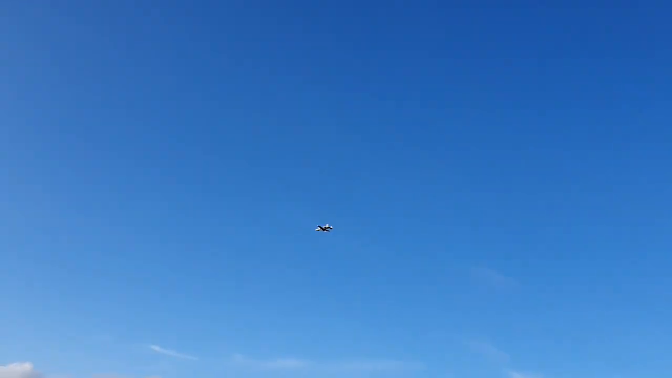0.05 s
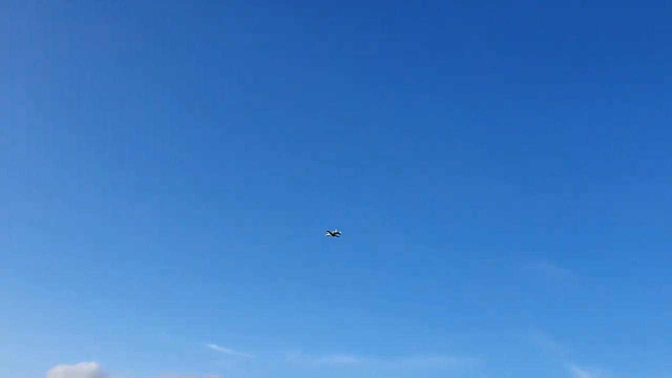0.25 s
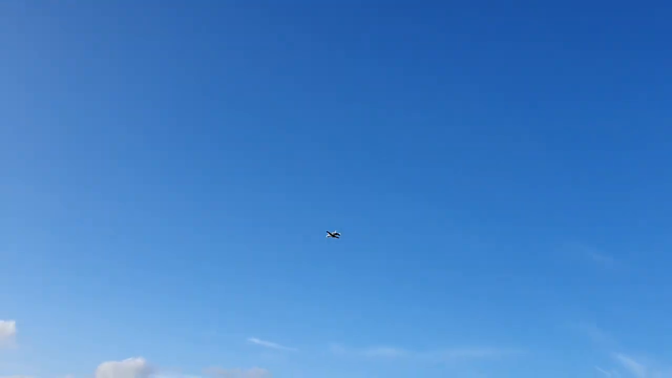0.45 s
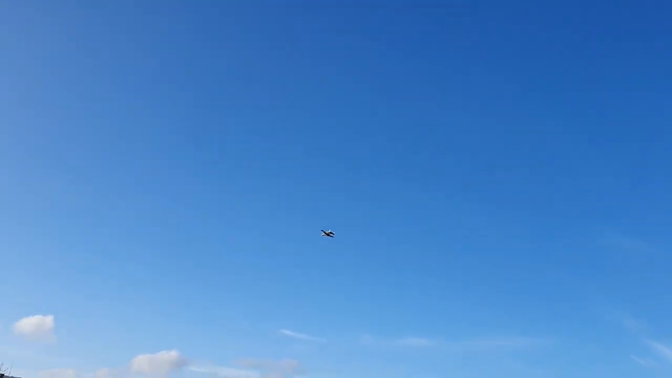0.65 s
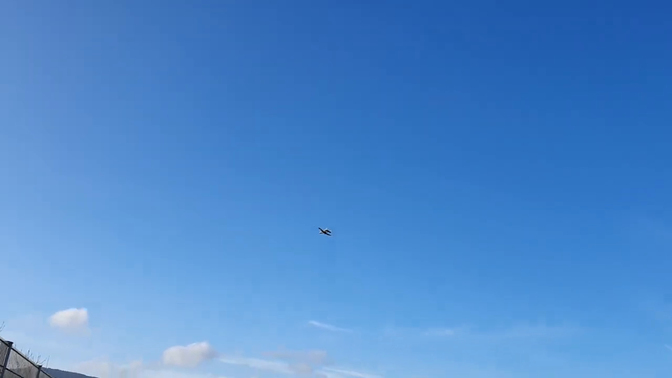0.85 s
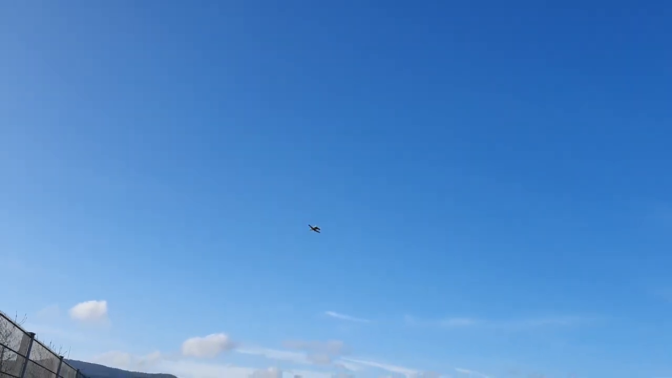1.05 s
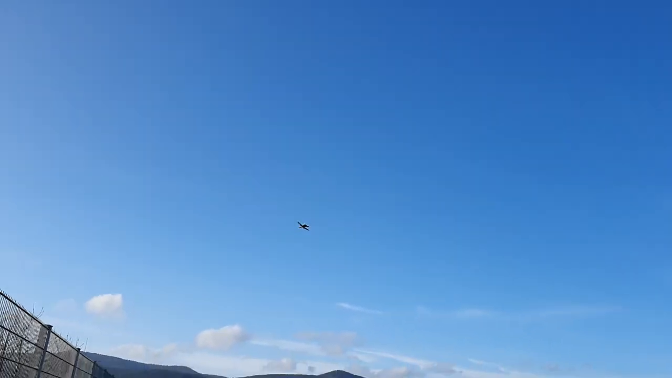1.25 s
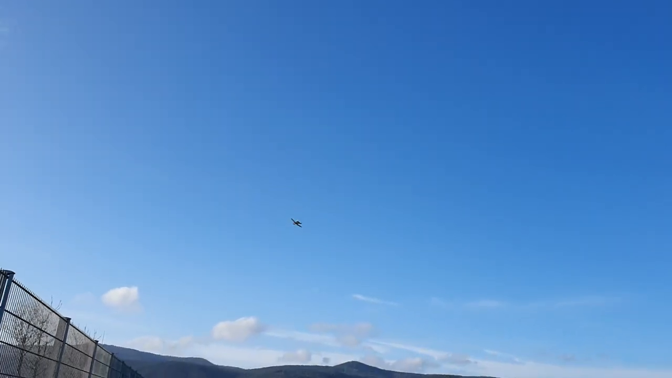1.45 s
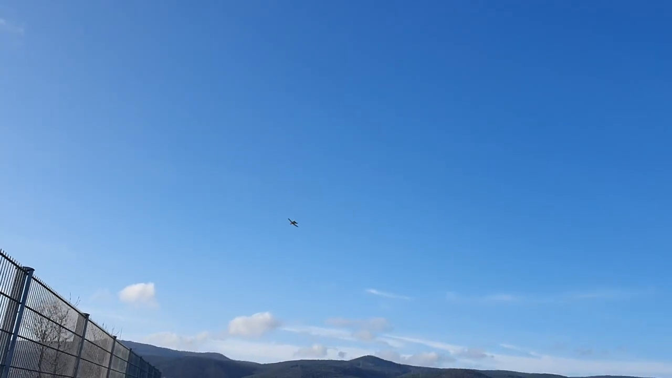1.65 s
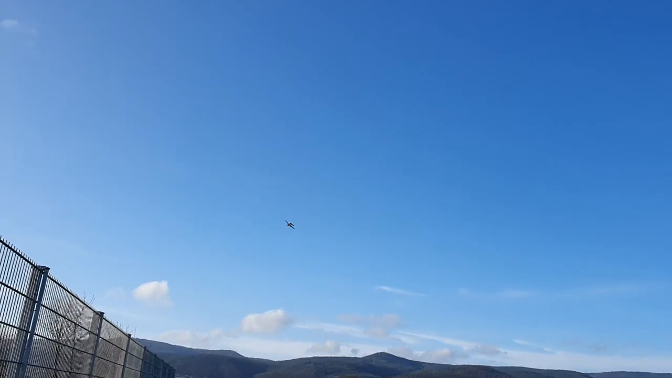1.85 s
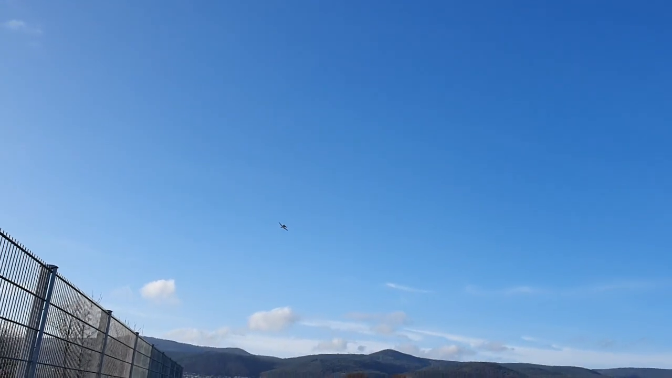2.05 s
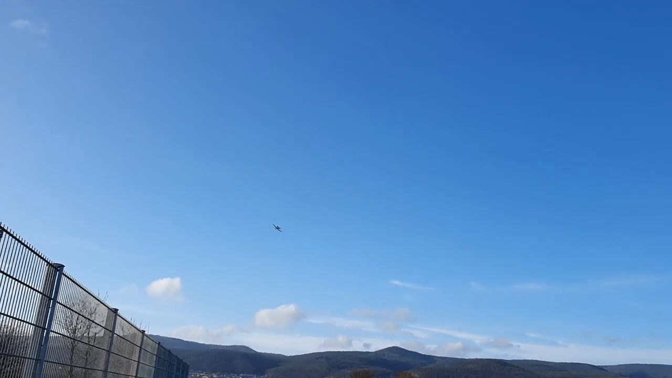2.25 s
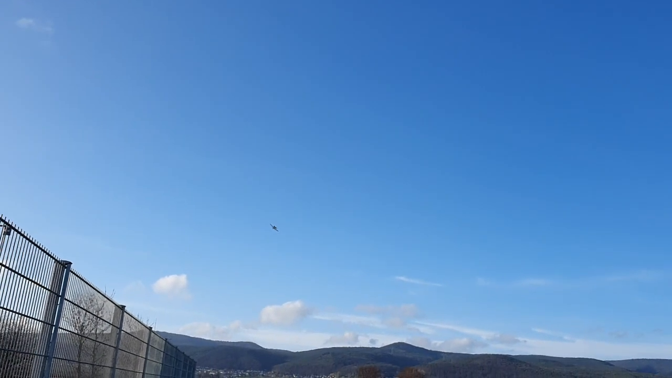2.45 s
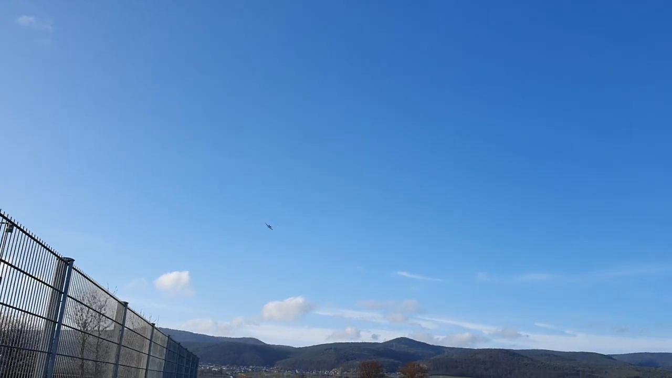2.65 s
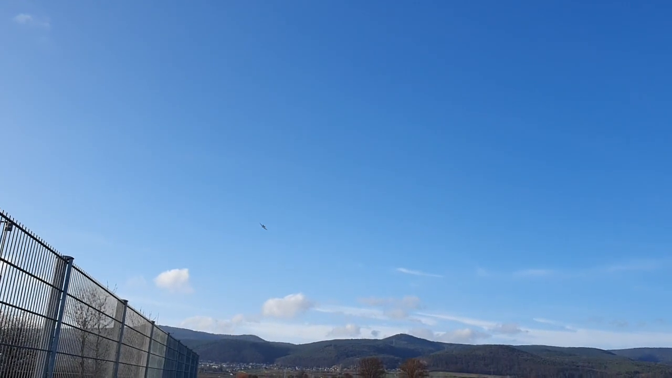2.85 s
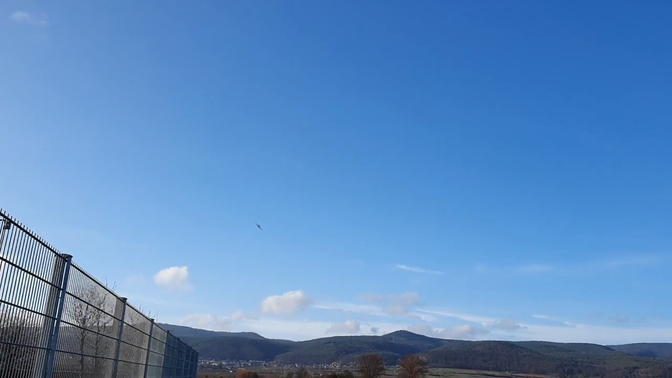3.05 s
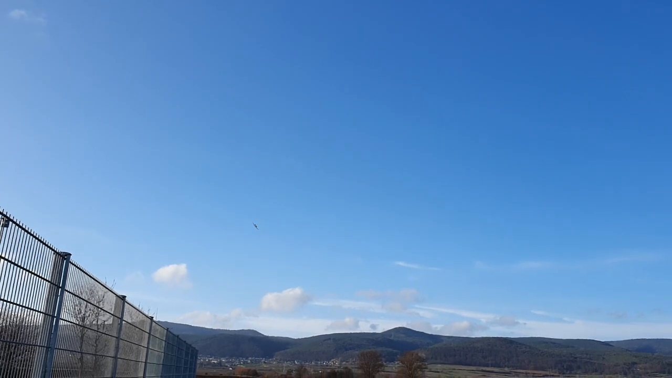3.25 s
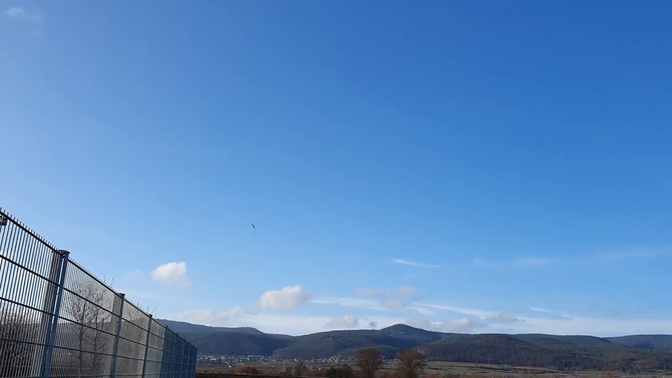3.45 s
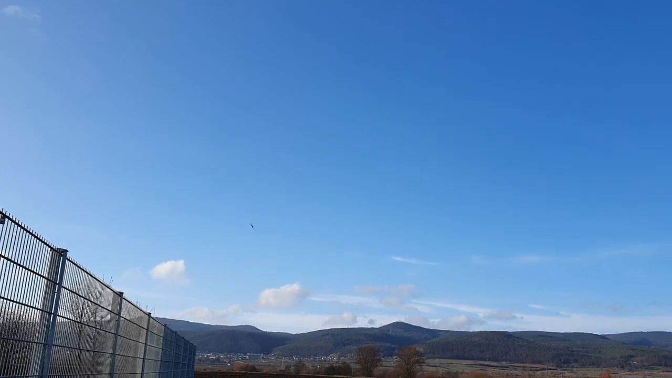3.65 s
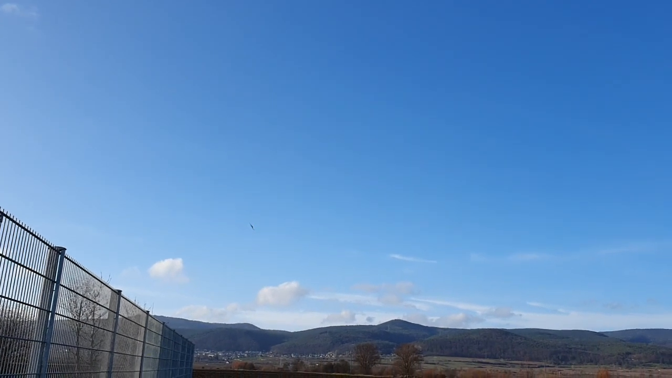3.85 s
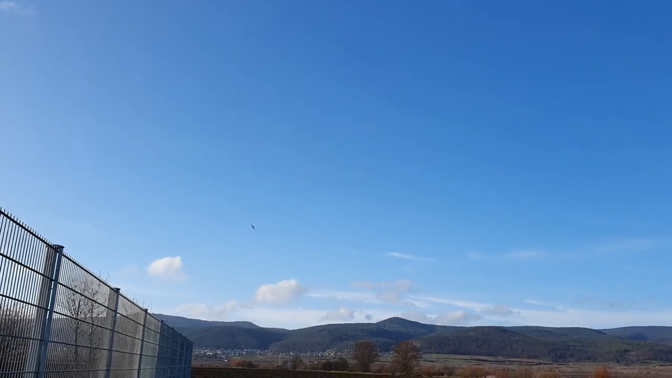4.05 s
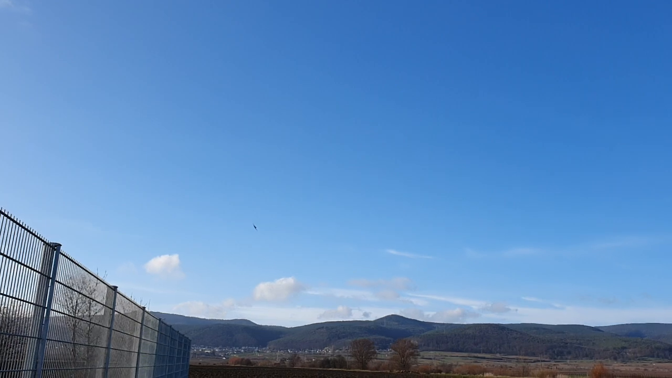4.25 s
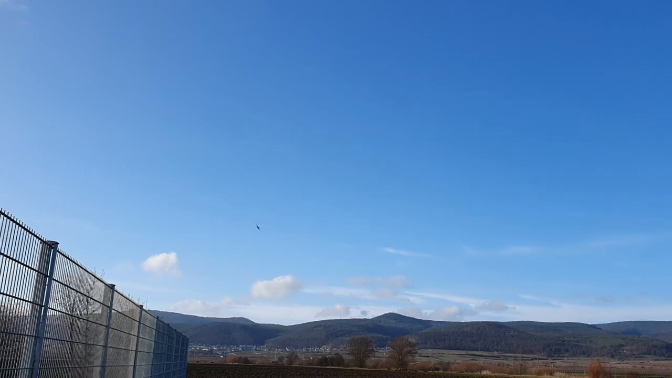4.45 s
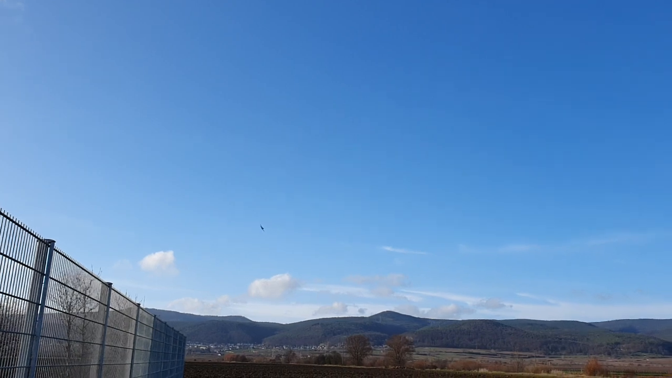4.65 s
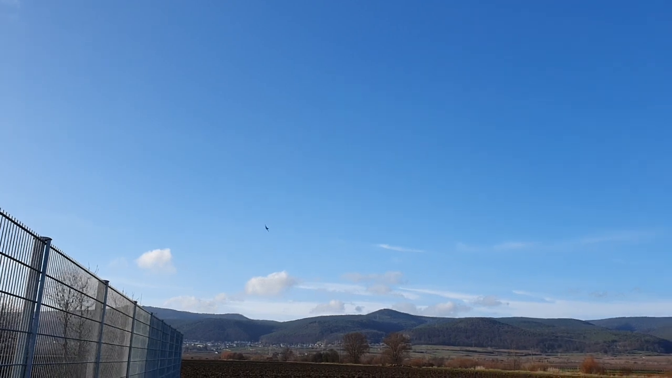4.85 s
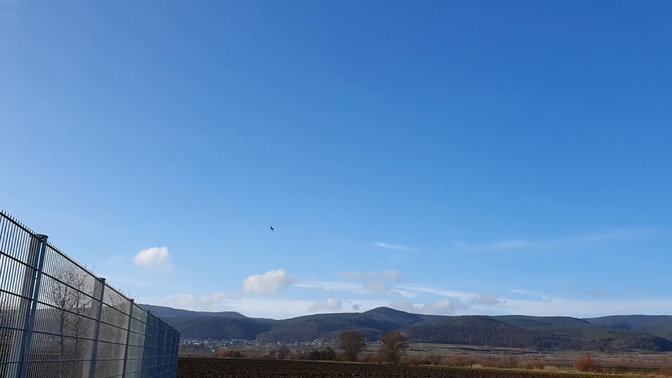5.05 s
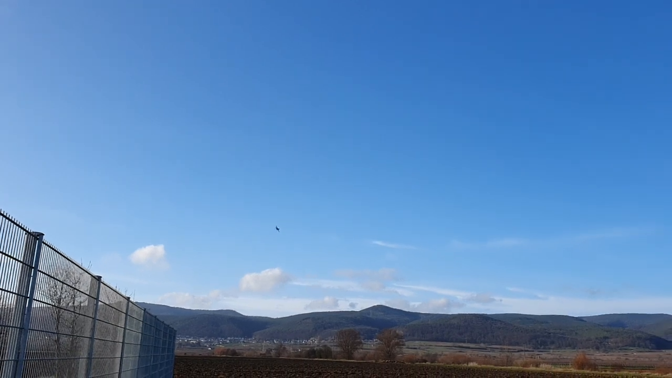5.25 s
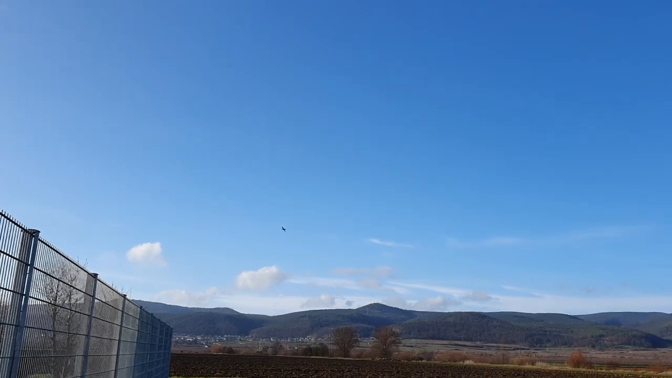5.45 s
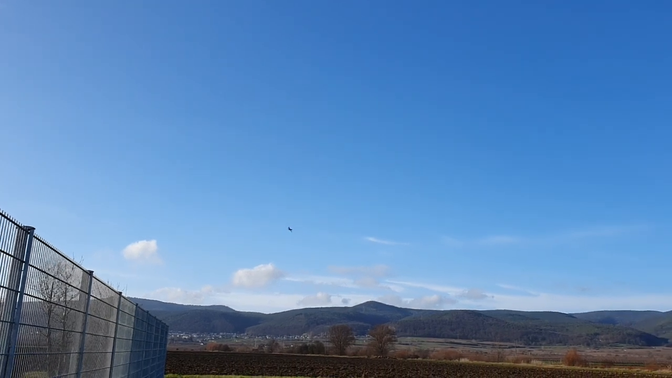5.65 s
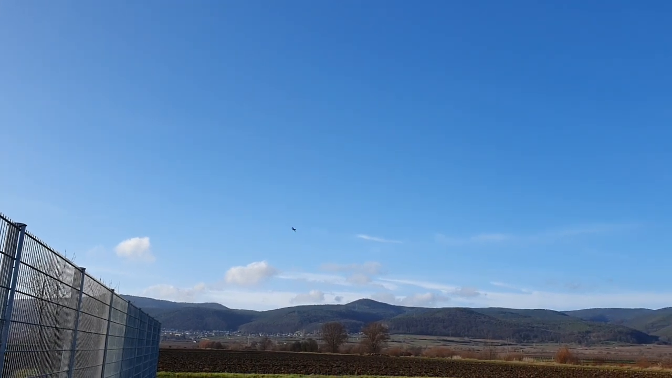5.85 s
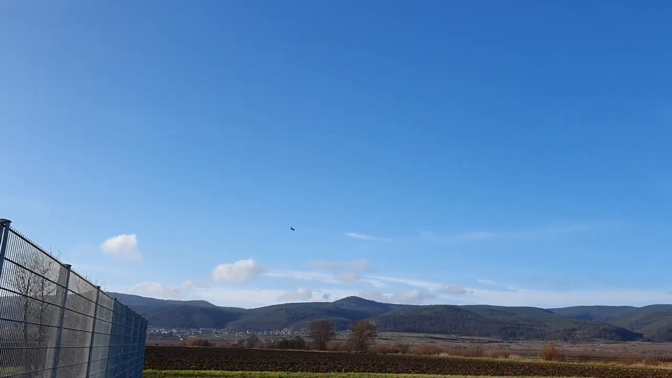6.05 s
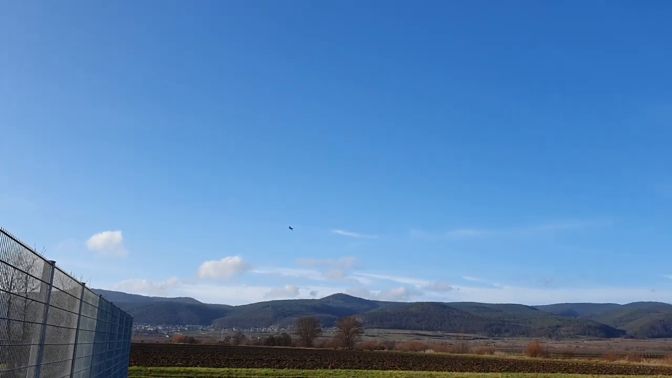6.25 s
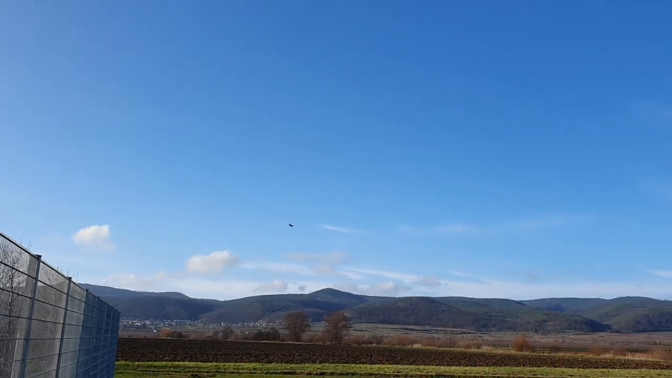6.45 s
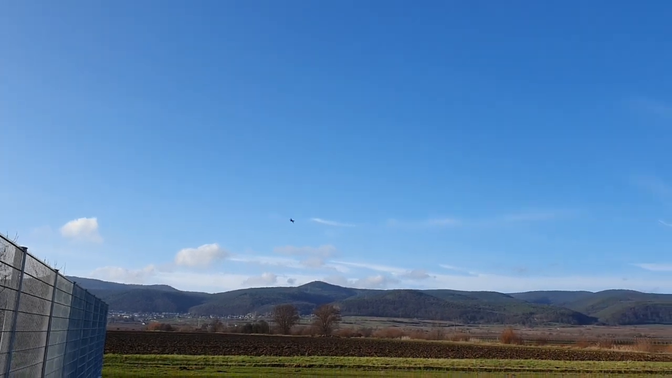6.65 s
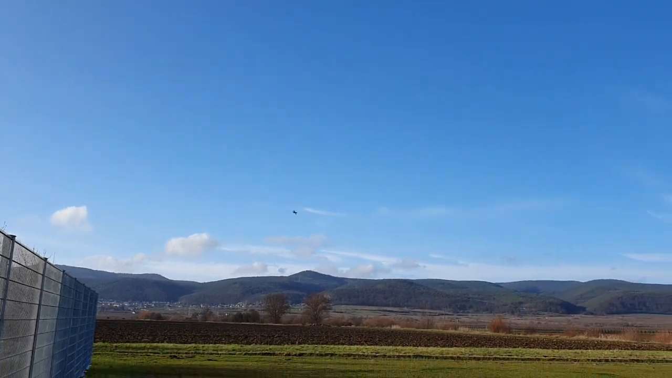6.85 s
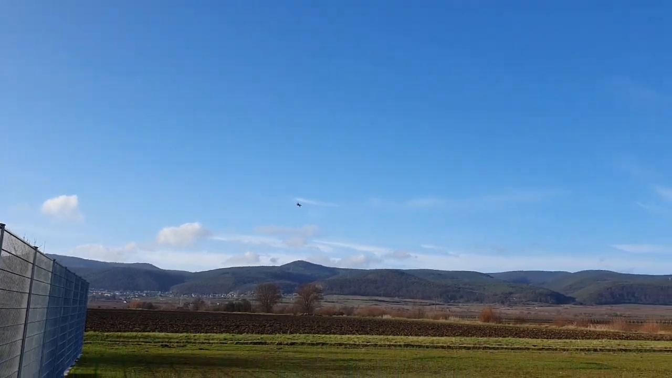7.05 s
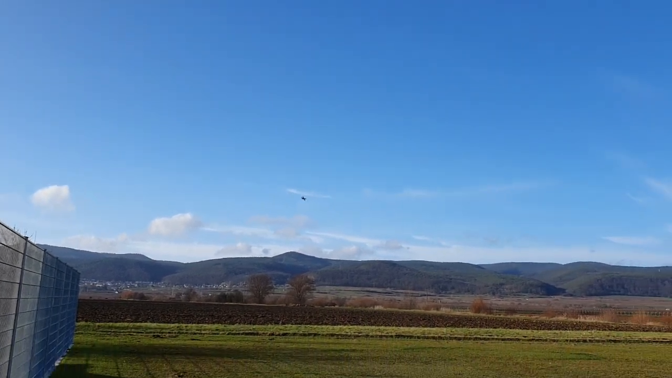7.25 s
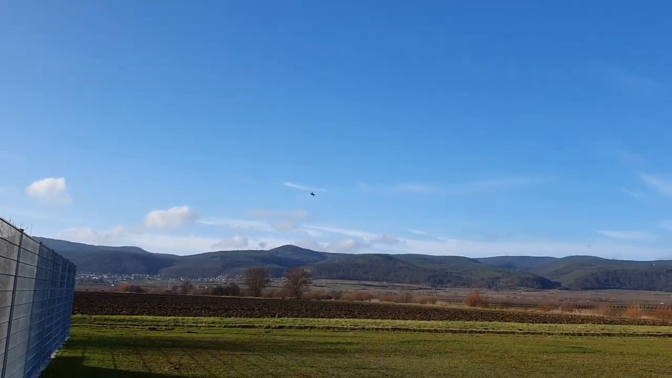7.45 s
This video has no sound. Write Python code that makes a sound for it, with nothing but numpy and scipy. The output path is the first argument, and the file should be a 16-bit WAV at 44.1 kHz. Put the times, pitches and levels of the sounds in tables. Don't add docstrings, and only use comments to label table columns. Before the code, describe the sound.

Open farmland, handheld stereo camera microphone. A turbine roar of turbulent exhaust begins strong and bright, then shrinks over about three seconds to a distant, dull, uneven rush that wavers in level and tone. Ground reflection gives it a phaser-like upward sweep. Soft bass gusts bump irregularly between left and right, over a faint low engine hum; a faint cloth rustle comes around six seconds.

```python
import sys
import numpy as np
from scipy import signal
from scipy.fft import rfft, irfft, next_fast_len
from scipy.io import wavfile
from scipy.ndimage import uniform_filter1d, map_coordinates

SR = 44100
rng = np.random.default_rng(int(sys.argv[2]) if len(sys.argv) > 2 else 0)


def volts_from_decibels(level):
    exponent = np.asarray(level, float) / 20
    return 10 ** exponent


def wav_out(sig):
    wavfile.write(sys.argv[1], SR, np.round(np.clip(np.atleast_2d(sig).T, -1, 1) * 32767).astype(np.int16))


N = 331191
FRAME = 1024
CONTROL_STEP = 32
FURROW_HZ = 2500

# time_s, distance (0 near - 1 far), bearing (0 start - 1 end)
FLIGHT = [
    (0, 0, 0),
    (.8, .1, .05),
    (1.5, .3, .3),
    (2.2, .5, .55),
    (3, .8, .9),
    (3.8, .9, 1),
    (4.7, 1, 1),
    (5.5, .95, 1),
    (7.51, 1, 1),
]
# time_s, delay_ms
ECHO = [(0, 4.833), (.56, 4.207), (.8, 3.99), (1.3, 3.576), (1.67, 3.374), (2.41, 2.991), (2.7, 2.893),
        (3.72, 2.68), (4.12, 2.615), (4.83, 2.43), (5.39, 2.36), (6.2, 2.205), (6.8, 2.135), (7.15, 2.1),
        (7.51, 2.035)]
# time_s, soil_share (low middle, soft soil, 0-1), furrow_share (treble scattered, 0-1)
SOFT = [
    (0, .25, .15),
    (1.4, .25, .1),
    (2, .3, .1),
    (2.7, .4, .05),
    (3.1, .03, .15),
    (3.8, .15, .35),
    (4.8, .12, .6),
    (6, .08, .6),
    (7.51, .15, .7),
]


def unit(x):
    return x / np.sqrt(np.mean(x ** 2) + 1e-20)


def along(points, hz):
    f, *cols = np.transpose(points)
    return np.squeeze([np.interp(np.log(hz + 1), np.log(f + 1), c) for c in cols])


def curves(rows, t=None):
    s, *cols = np.transpose(rows)
    t = np.arange(N) / SR if t is None else t
    return [np.interp(t, s, c) for c in cols]


def wobble(rate):
    knots = rng.standard_normal(int(N * 60 / SR) + 4)
    return map_coordinates(knots, [np.arange(N) * min(rate, 59) / SR])


def bumps(rows, square):
    s, _, length = np.transpose(rows)[:, :, None]
    t = np.arange(0, N, CONTROL_STEP) / SR
    return np.exp(-abs(2 * (t - s) / length) ** square)


def full(coarse):
    return np.interp(np.arange(N), np.arange(0, N, CONTROL_STEP), coarse)


def filtered(x, response):
    m = next_fast_len(N + 8192)
    tail = x[..., :-FRAME:-1] * np.hanning(2 * FRAME)[FRAME + 1:]
    x = np.concatenate([x, tail], axis=-1)
    return irfft(rfft(x, m) * response(np.fft.rfftfreq(m, 1 / SR)), m)[..., :N]


def extended(x):
    return np.pad(x, ((0, 0), (0, FRAME)), mode="reflect")


def delayed(x, ms):
    return map_coordinates(x, [np.arange(N) - ms * SR / 1000], mode="mirror")


def jet():
    # frequency_hz, level_db, lag_rad
    ground = [(200, -1, -.35), (340, -.3, .5), (430, -.3, .6), (510, -.5, -.2), (700, -.5, -.2),
              (1050, -.8, .3), (1700, -1.5, .25), (2600, -2.2, -.2), (4500, -3, -.3), (9000, -9, 0)]
    # delay_ms, level_db
    holder = [
        (.72, -38.5),
        (2.25, -19),
    ]
    # time_s, delay_ms, level_db
    chest = [
        (0, 1.13, -14),
        (.8, 1.36, -13),
        (2, 1.41, -12.5),
        (3.2, 1.35, -12),
        (4.3, 1.44, -16),
        (4.8, 1.27, -21),
        (5.5, 1.435, -10.5),
        (6.2, 1.29, -12.5),
        (7.51, 1.32, -16),
    ]
    soft_low_hz, soft_hz, jacket_hz = 440, 760, 6000
    far = curves(FLIGHT)[0]
    front, stray = airframe(volts_from_decibels(-2.2) * roar(flutter_db=.9, air_db=11))

    def mirror(hz):
        level_db, lag = along(ground, hz)
        return volts_from_decibels(level_db) * np.exp(-1j * lag)

    def losses(hz):
        soil = 1 / (1 + (hz / soft_hz) ** 8) / (1 + (soft_low_hz / (hz + 1)) ** 12)
        return np.array([soil, 1 / (1 + (hz * 0 + FURROW_HZ / (hz + 1)) ** 8)])

    image = filtered(front, mirror)
    image *= volts_from_decibels(1.2 * (far - 1))
    image *= volts_from_decibels(.8 - 1.8 * far)
    soil, furrows = filtered(image, losses)
    soil_share, furrow_share = curves(SOFT)
    image = image - soil_share * soil - furrow_share * furrows
    pair = ports(front, delayed(image, curves(ECHO)[0] + .005 * wobble(5)), stray)

    chest_ms, chest_db = curves(chest)
    muffled = filtered(pair, lambda hz: 1 / (1 + (hz / jacket_hz) ** 2))
    pair = pair + volts_from_decibels(chest_db) * np.array([delayed(v, chest_ms) for v in muffled])

    def body(hz):
        cloth = 1 / (1 + (hz / 3500) ** 2)
        return 1 + cloth * sum(volts_from_decibels(db) * np.exp(-2j * np.pi * hz * ms / 1000) for ms, db in holder)

    return filtered(pair, body)


def roar(flutter_db, air_db):
    # low_hz, high_hz
    heard_band = (280, 5500)
    # frequency_hz, density_db (per Hz)
    near_colour = [(120, -14.5), (400, -12), (900, -7), (1500, -6), (2350, -6.5), (2650, -13), (4300, -8.5),
                   (5100, -15.5), (6300, -14), (7400, -28.5), (9500, -34.5), (11200, -33), (12000, -43),
                   (14000, -44)]
    # frequency_hz, density_db (per Hz)
    far_colour = [(120, 4), (400, -0.5), (800, 0.5), (1500, 0), (2300, -5.5), (2600, -9.5), (3200, -15),
                  (4200, -20.5), (5000, -28.5), (6200, -35), (7600, -36)]
    # time_s, level_db, tilt_db (per octave), whine_db (hump)
    power = [(0, -26, -3.5, 1), (.2, -25, -2.5, 3.5), (.6, -24.5, -1.96, 3), (1.2, -25, -2.23, 4.5),
             (2.1, -27.5, -1.5, 3), (2.6, -30.5, 0.1, -1), (3, -31.5, -0.66, -8), (3.65, -30.5, 0.1, -1.5),
             (4, -34, 0.9, -8.5), (4.45, -34, 1, -7.5), (4.65, -35, 0, 1), (5.15, -33.5, -0.1, 4.5),
             (5.35, -30.5, 1.4, 1.5), (5.7, -30, 2.5, -2.5), (6.3, -31.5, 3.5, -4), (6.7, -32, 3.5, 1),
             (7.05, -37, 3, -1.5), (7.51, -35, 0.6, 4)]
    # time_s, centre_hz, level_db, half_length_s
    patches = [(0.087, 7850, 10.5, 0.17), (.2, 5100, -6, .25), (0.225, 1000.0, 3.5, 0.13),
               (0.86, 3320, 5, 0.51), (0.88, 1360, 5, 0.98), (1.034, 2460, 7, 0.12), (1.16, 563, -2.5, 0.58),
               (1.18, 7760, -3.5, 0.47), (1.432, 2100, -7, 0.22), (1.46, 1100, -5, 0.16),
               (1.67, 2800, -8, 0.26), (1.763, 680, 7.5, 0.13), (1.81, 1500, -4.5, 0.26),
               (2.01, 2320, 4, 0.16), (2.207, 1810, -10, 0.14), (2.305, 627, 7, 0.13),
               (2.63, 1520, -7.5, 0.19), (2.69, 1090.0, 2.5, 1), (2.884, 2310, 2, 0.73),
               (2.97, 3800, -2.5, 0.63), (3.127, 3020, -6, 0.18), (3.268, 663, -4.5, 0.19),
               (3.735, 2080, -6, 0.13), (3.76, 7660, -5, 0.19), (4.04, 3400, -5, 0.15),
               (4.058, 2600, -5.5, 0.46), (4.22, 3600, 5, .2), (4.322, 958, -7, 1), (4.443, 2860, 6, 0.34),
               (4.483, 1200, -4.5, 0.13), (4.855, 7180.0, -9.5, 0.8), (4.906, 770, 6.5, 0.15),
               (4.959, 1655, -8, 0.62), (4.964, 7800.0, 8, 0.13), (5.478, 8040, -6, 0.24),
               (5.67, 1790.0, 5, 0.13), (5.74, 3200, -4.5, 1), (5.766, 860, 3.5, 0.45),
               (5.99, 2330, -6, 0.15), (6.206, 4240, -7, 0.46), (6.251, 576, -3, 0.8),
               (6.267, 1000.0, -5.5, 0.13), (6.338, 745, 4.5, 0.47), (6.493, 1310, 4, 0.11),
               (6.908, 3630, 3, 0.056), (7.147, 3140, 3.0, 0.3), (7.2, 7300, -7, .35), (7.2, 700, 8, 0.19),
               (7.237, 1390, 4, 0.18), (7.285, 2410, 3.5, 0.18)]
    tilt_hz, tilt_top_hz, whine_hz = 1000, 4400, 1986
    whine_oct, patch_oct, top_loss_db = 0.45, 0.14, 13
    overlap = FRAME * 3 // 4
    hz, t, z = signal.stft(rng.standard_normal((2, N)), SR, nperseg=FRAME, noverlap=overlap)
    far = curves(FLIGHT, t)[0]
    dull = along(far_colour, hz.clip(0, 7000))[:, None]
    dull = dull - air_db * np.outer((hz / 1000 - 7).clip(0), far)
    shape = np.outer(along(near_colour, hz), 1 - far) + dull * far
    shape -= top_loss_db * np.outer((hz / 1000 - 11).clip(0), far)

    level_db, tilt_db, whine_db = curves(power, t)
    octave = lambda centre_hz: np.log2(hz.clip(heard_band[0], tilt_top_hz) / centre_hz)
    shape += np.outer(octave(tilt_hz), tilt_db)
    shape += np.outer(np.exp(-(octave(whine_hz) / whine_oct) ** 2), whine_db)
    heard = (hz > heard_band[0]) & (hz < heard_band[1])
    shape += level_db - 10 * np.log10(np.sum(volts_from_decibels(2 * shape[heard]), axis=0) / len(hz))

    def turbulence(bins, frames):
        noise = rng.standard_normal(z.shape[1:])
        return unit(uniform_filter1d(uniform_filter1d(noise, size=bins, axis=0), size=frames, axis=1))

    flutter, swirls = turbulence(10, 9), turbulence(8, 70)
    s, patch_hz, patch_db, half = np.transpose(patches)[:, :, None]
    patch_gain = patch_db * np.exp(-(np.log2((hz + 1) / patch_hz) / patch_oct) ** 2)
    shape += patch_gain.T @ np.exp(-((t - s) / half) ** 2)
    shape += .4 * swirls + flutter_db * flutter
    return signal.istft(z * volts_from_decibels(shape), SR, nperseg=FRAME, noverlap=overlap)[1][:, :N]


def airframe(x):
    # time_s, delay_ms, level_db
    tail = [
        (3.3, 0.17, -32),
        (3.8, 0.27, -20),
        (4.3, 0.47, -19),
        (5.2, 0.42, -28),
        (5.6, 0.82, -30),
        (6, 0.77, -8.5),
        (6.5, 0.84, -10),
        (7, 0.9, -3.5),
        (7.51, 0.96, -22),
    ]
    # time_s, delay_ms, level_db
    fin = [
        (6.6, 0.78, -15),
        (6.85, 0.67, -7),
        (7.1, 0.62, -6),
        (7.3, 0.36, -15),
        (7.51, 0.48, -15),
    ]
    (tail_ms, tail_db), (fin_ms, fin_db) = curves(tail), curves(fin)
    skewed = filtered(x, lambda hz: np.exp(1.53j) * hz / (hz + 400))
    return [v + volts_from_decibels(tail_db) * delayed(w, tail_ms) - volts_from_decibels(fin_db) * delayed(v, fin_ms) for v, w in zip(x, skewed)]


def ports(front, image, stray):
    # frequency_hz, first_lead_rad, last_lead_rad (left leads, by bearing)
    port_turn = [(100, 0, 0), (700, .2, .5), (1300, .1, 1.1), (2000, -.8, .2), (2600, -1, .4),
                 (3200, 0, 2.9), (4000, -.4, 2.7), (4700, -1.3, 1.9), (5300, .6, 2.2), (6300, -.1, 3.5),
                 (7300, -2.1, 3), (8200, -1.2, 4), (10000, -.2, 5.4), (13000, -1.7, 5.5)]
    # frequency_hz, left_right_db, coherence (0-1)
    port_tilt = [(170, 0.5, 0.69), (320, -.5, 1), (500, -1.1, 1), (1090, 0.5, 0.88), (1680, 4, 0.86),
                 (2140, 2, 0.94), (3060, -0.5, 0.18), (3960, 1.8, 0.62), (5330, 0, 0.58),
                 (6400, -3.5, 0.67), (7350, 6.5, 0.91), (9700, 3.5, 0.46), (13000, 6.5, 0.65)]
    hz, t, z = signal.stft(extended(np.array([front, image, stray])), SR, nperseg=FRAME, boundary="even")
    echo = 0.7 * (1 - np.outer(1 / (1 + (FURROW_HZ / (hz + 1)) ** 8), curves(SOFT, t)[1]))
    lag = np.exp(-2j * np.pi * np.outer(hz, curves(ECHO, t)[0]) / 1000)
    z[2] *= (1 + echo * lag) / np.hypot(1, echo)
    first, last = along(port_turn, hz)
    turn = first[:, None] + np.outer(last - first, curves(FLIGHT, t)[1])
    tilt_db, alike = along(port_tilt, hz)[:, :, None]
    mix = np.arccos(alike.clip(0, 1)) / 2
    below = np.pi * hz[:, None] * .025 / 1000
    pair = []
    for s in (1, -1):
        wave = np.cos(mix) * (z[0] + z[1] * np.exp(1j * s * below)) + s * np.sin(mix) * z[2]
        pair.append(volts_from_decibels(s * tilt_db / 2) * np.exp(.5j * s * turn) * wave)
    return signal.istft(np.array(pair), SR, nperseg=FRAME)[1][:, :N]


def wind():
    # frequency_hz, density_db (per Hz)
    buffet = [(15, -23), (25, -12), (38, 0.5), (55, 6.5), (90, 2.5), (140, -16.5), (250, -18), (500, -26.5),
              (900, -49.5)]
    # middle_s, peak_db, length_s
    gusts = [(0.202, -39, .11), (0.577, -44, 0.13), (0.983, -32, 0.091), (1.268, -44, 0.24),
             (1.48, -49, 0.22), (1.69, -39, 0.061), (2.02, -35, 0.28), (2.195, -58, 0.26),
             (2.457, -42, 0.12), (2.604, -25.5, 0.092), (2.73, -42, 0.096), (3.21, -38, 0.12),
             (3.43, -36, 0.13), (3.644, -37.5, 0.25), (3.995, -40.5, 0.081), (4.157, -44, 0.16),
             (4.332, -35, 0.078), (4.596, -40, 0.05), (5.068, -53, 0.18), (5.294, -41, 0.098),
             (5.512, -35.5, 0.11), (5.665, -40, 0.093), (6.012, -48, 0.078), (6.508, -40, 0.13),
             (6.64, -34, 0.083), (7.04, -44, 0.56), (7.352, -44, 0.098), (7.5, -27, 0.036)]
    breeze_db, steady = -42.5, round(0.064 * SR)
    edges = lambda hz: (hz / 18) ** 2 / (1 + (hz / 18) ** 2) / (1 + (hz / 900) ** 6)
    noise = rng.standard_normal((3, N))
    shared, left, right = filtered(noise, lambda hz: volts_from_decibels(along(buffet, hz)) * edges(hz))
    lumps = volts_from_decibels(1.5 * np.array([wobble(15), wobble(22)]))
    push = 0.98 * shared + np.array([left, right])
    even = uniform_filter1d(uniform_filter1d(push ** 2, size=steady), size=steady)
    strength = full(volts_from_decibels(breeze_db) + volts_from_decibels(np.transpose(gusts)[1]) @ bumps(gusts, square=2.3))
    return strength * unit(lumps * push / np.sqrt(abs(even) + 1e-12))


def sleeve():
    # time_s, pressure_db, left_right_db
    rub = [
        (5.74, -86, 0),
        (5.86, -62.5, -4),
        (5.96, -62, -3),
        (6.024, -67, -.5),
        (6.17, -62, -4),
        (6.36, -62, -0.5),
        (6.43, -66, -2.5),
        (6.6, -68.5, -5),
        (7.15, -85, -1),
    ]
    # frequency_hz, density_db (per Hz)
    cloth = [(3000, -32), (5500, -9), (7400, -0.5), (9500, 0), (11200, 0), (13900, -7), (15500, -9)]
    # middle_s, peak_db, length_s
    slips = [
        (7.398, -68, .09),
    ]
    # frequency_hz, density_db (per Hz)
    skin = [(5000, -33), (7500, -6), (9400, -15), (11300, -2), (12500, -3), (15500, -20.5)]
    # middle_s, pitch_hz, level_db, half_length_s
    squeaks = [
        (5.967, 13600, -68, .007),
        (5.978, 15250, -70, .009),
    ]
    slip_lean_db = 9
    friction = lambda colour: unit(filtered(rng.standard_normal((2, N)), lambda hz: volts_from_decibels(along(colour, hz))))
    t = np.arange(N) / SR
    press_db, lean_db = curves([(0, -120, 0), (5.6, -120, 0), *rub, (7.3, -120, 0)])
    weave_db = 1.2 * wobble(30) + 1.2 * np.array([wobble(20), wobble(50)])
    drag = volts_from_decibels(press_db + weave_db + np.outer([.5, -.5], lean_db)) * friction(cloth)
    press = full(volts_from_decibels(slips[0][1] - slip_lean_db) * bumps(slips, square=1.6)[0])
    slip = volts_from_decibels([[-slip_lean_db], [slip_lean_db]]) * press * friction(skin)
    squeak = sum(volts_from_decibels(db) * np.exp(-((t - s) / half) ** 2) * np.sin(2 * np.pi * hz * t)
                 for s, hz, db, half in squeaks)
    return drag + slip + squeak


def hum():
    # pitch_hz, level_db
    orders = [
        (57, -63.5),
        (114, -41.5),
        (171, -52.5),
    ]
    drift = np.cumsum(1 + 0.0026 * wobble(1.415)) / SR
    return sum(volts_from_decibels(db - 0.5 + 1.8 * wobble(13.0)) * np.sin(2 * np.pi * hz * drift) for hz, db in orders)


def scene():
    roll_off = lambda hz: 1 / (1 + (70 / (hz + 1)) ** 4)
    lean = volts_from_decibels([[-2], [2]])
    return filtered(jet(), roll_off) + wind() + lean * hum() + sleeve()


def wind_guard(left):
    # middle_s, depth_db, length_s
    ducks = [(.1, -10, 0.13), (.66, -19, 0.031), (.82, -12, 0.078), (.91, -12, 0.045), (1.14, -26, 0.14),
             (1.4, -14, 0.058), (1.6, -27, 0.043), (1.74, -4.5, 0.25), (2.1, -18, 0.12), (2.62, -41, 0.082),
             (3.1, -5, 0.2), (3.61, -21, .07), (3.88, -22, 0.044), (4.33, -14, 0.085), (4.44, -16, 0.056),
             (4.64, -7, 0.08), (4.76, -12, 0.12), (5.02, -3.5, 0.18), (5.21, -33, 0.091),
             (5.39, -33, 0.056), (5.49, -22, 0.05), (5.97, -6, 0.065), (6.07, -8, 0.027),
             (6.23, -26, 0.087), (6.36, -7, 0.13), (6.52, -19, .07), (6.7, -20, 0.13), (6.88, -24, 0.1),
             (7.37, -30, 0.07)]
    bass = filtered(left, lambda hz: 1 / (1 + (hz / 200) ** 4))
    depth_db = 1.7 * full(np.transpose(ducks)[1] @ bumps(ducks, square=2.9))
    return left + (volts_from_decibels(depth_db) - 1) * bass


def starved(x):
    # frequency_hz, near_db, far_db (per bin)
    gate_floor = [(5000, -112, -112), (6800, -100, -100), (7200, -97, -97), (7900, -96, -96),
                  (8050, -92, -91), (8650, -93, -93), (8750, -94, -106), (9800, -97.5, -107),
                  (10900, -103, -111), (11500, -104, -111), (11800, -90, -115), (14400, -93, -115),
                  (14600, -60, -125)]
    hz, t, z = signal.stft(extended(x), SR, nperseg=FRAME, boundary="even")
    band = hz.astype(int) // 725
    starts = np.flatnonzero(np.diff(band, prepend=-1))
    power = np.add.reduceat(np.mean(abs(z) ** 2, axis=0), starts, axis=0)
    level = uniform_filter1d(power / np.bincount(band)[:, None], size=2, axis=1)[band]
    near_db, far_db = along(gate_floor, hz)[:, :, None]
    floor_db = near_db + (far_db - near_db) * curves(FLIGHT, t)[0] ** 8
    return signal.istft(z * (level > volts_from_decibels(2 * floor_db)), SR, nperseg=FRAME)[1][:, :N]


def dither():
    # frequency_hz, density_db (per Hz)
    hiss_colour = [(100, -4), (8000, -4), (11000, 0), (15500, -2), (16000, -40)]
    masked_db, freed = -11, 1.2
    hiss = unit(filtered(rng.standard_normal((2, N)), lambda hz: volts_from_decibels(along(hiss_colour, hz))))
    hz, t, z = signal.stft(extended(hiss), SR, nperseg=FRAME, boundary="even")
    frame = rng.random(len(t))[::2].repeat(2)[:len(t)]
    cell = rng.random((len(hz), len(t)))[::8, ::2]
    need = .6 * frame + .4 * cell.repeat(8, 0).repeat(2, 1)[:len(hz), :len(t)]
    kept = need < np.minimum(freed * curves(FLIGHT, t)[0] - .08, .85)
    return signal.istft(z * np.where(kept, 1, volts_from_decibels(masked_db)), SR, nperseg=FRAME)[1][:, :N]


def low_pass(x):
    return signal.sosfilt(signal.butter(12, 15610, fs=SR, output="sos"), x)


def record(dry):
    guarded = np.array([wind_guard(dry[0]), dry[1]])
    mix = starved(guarded) + volts_from_decibels(-84.2) * dither()
    fade_s = .005
    remaining = (np.arange(N)[::-1] / (fade_s * SR)).clip(0, 1)
    mix = mix * np.sin(np.pi / 2 * remaining) ** 2
    return low_pass(mix)


dry = scene()
out = record(dry)
wav_out(out)
```